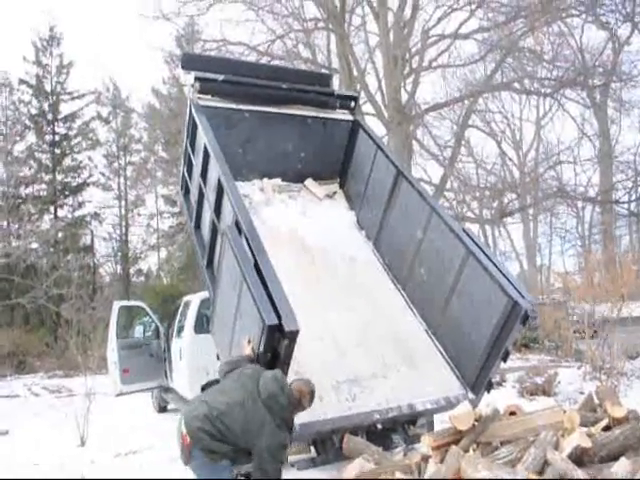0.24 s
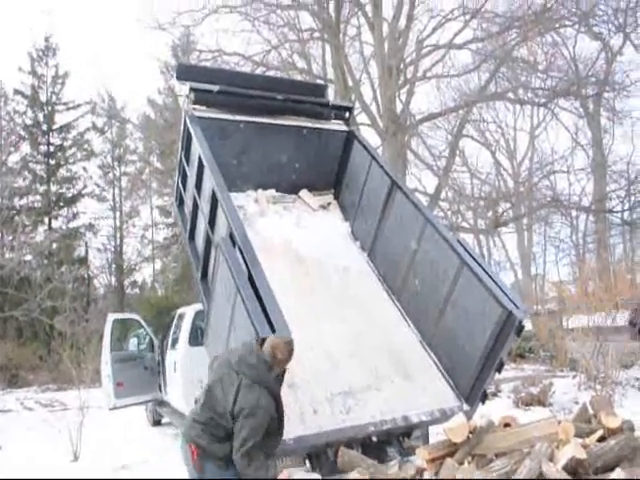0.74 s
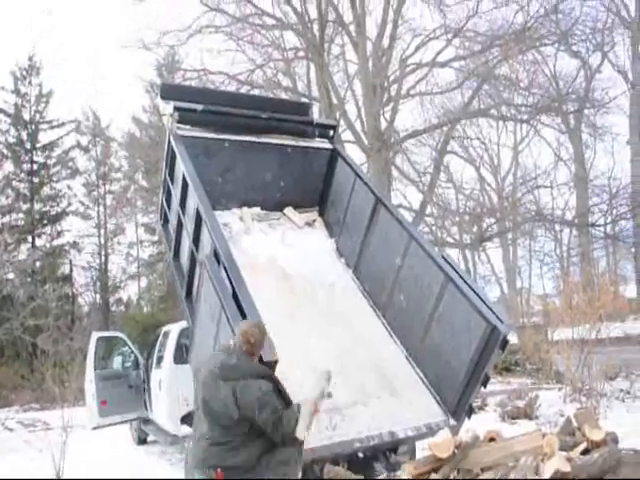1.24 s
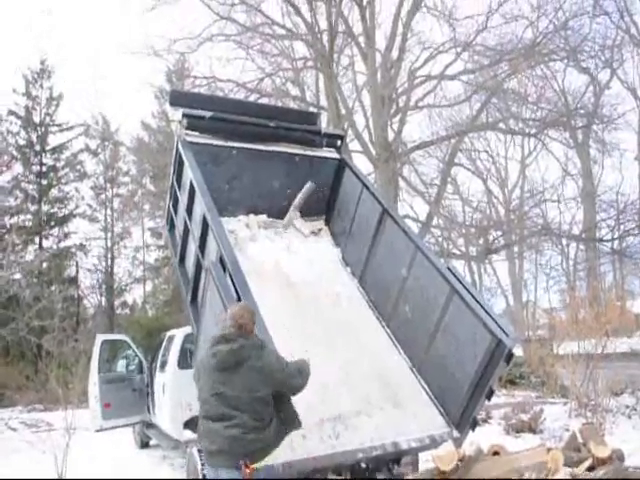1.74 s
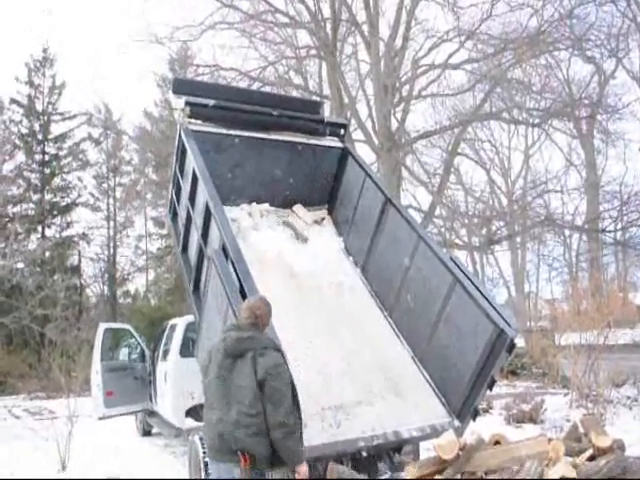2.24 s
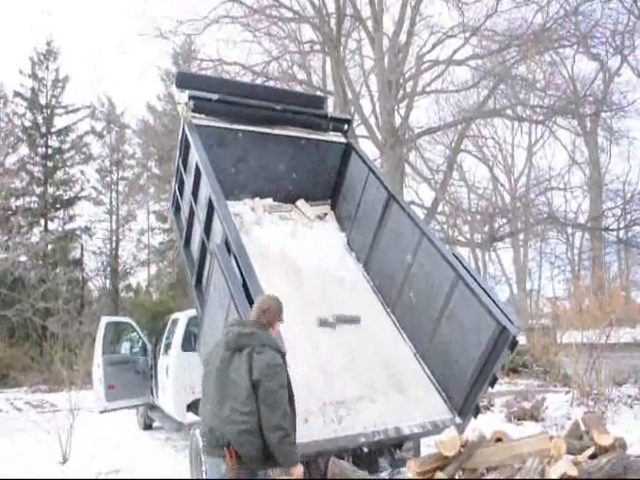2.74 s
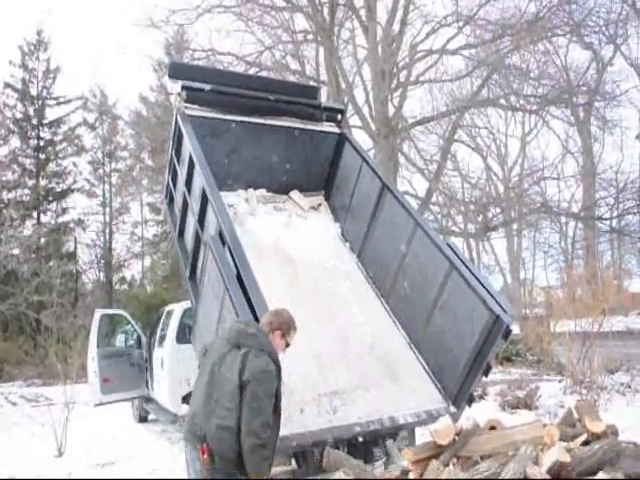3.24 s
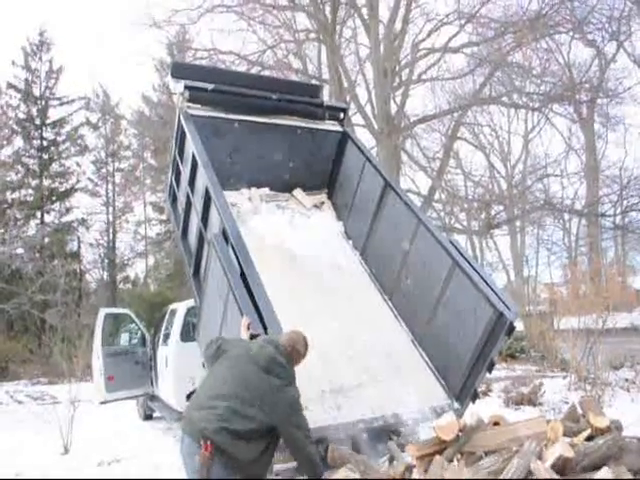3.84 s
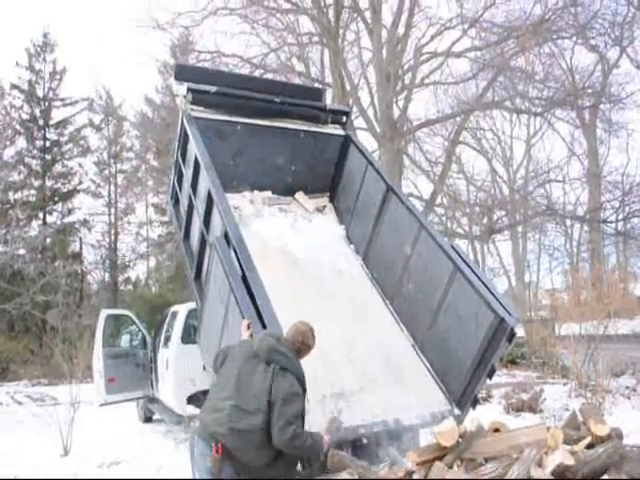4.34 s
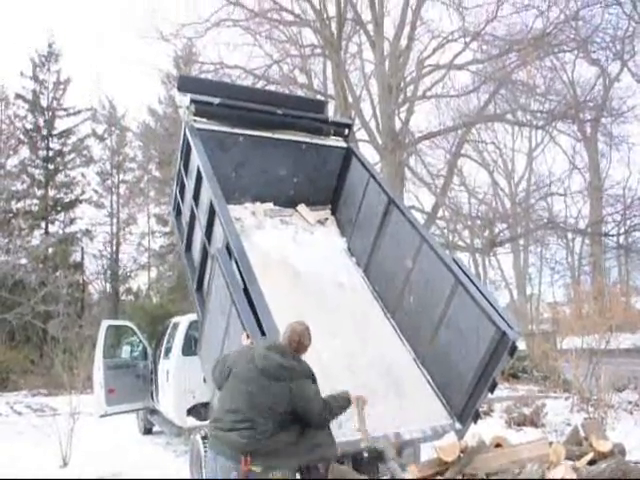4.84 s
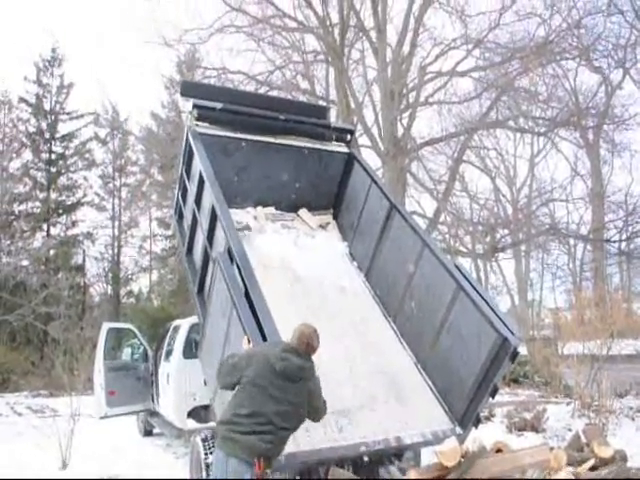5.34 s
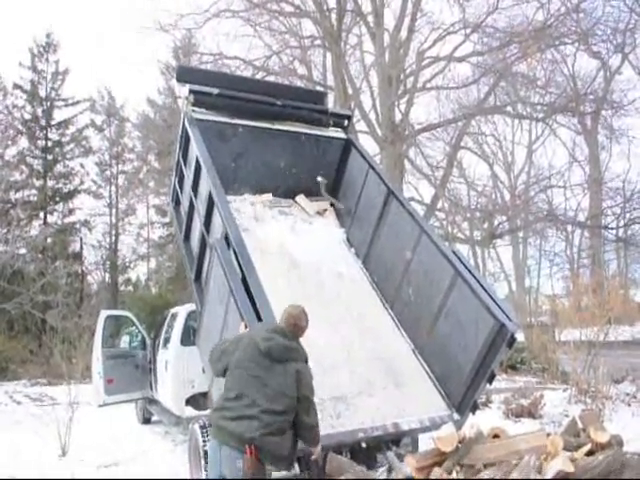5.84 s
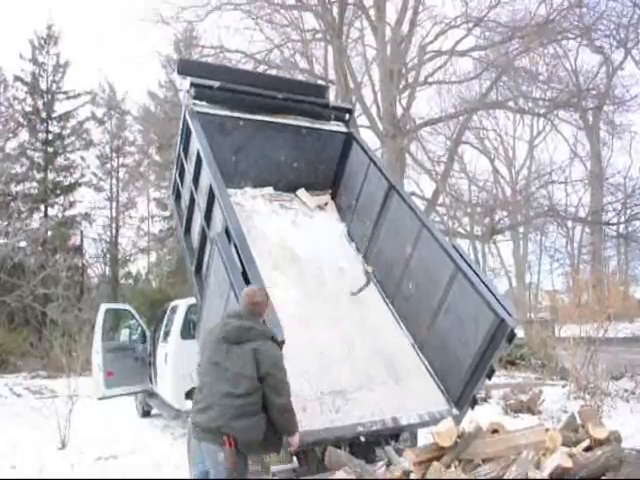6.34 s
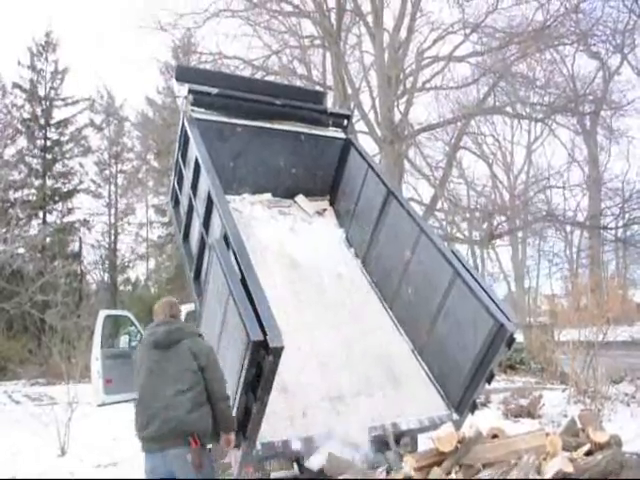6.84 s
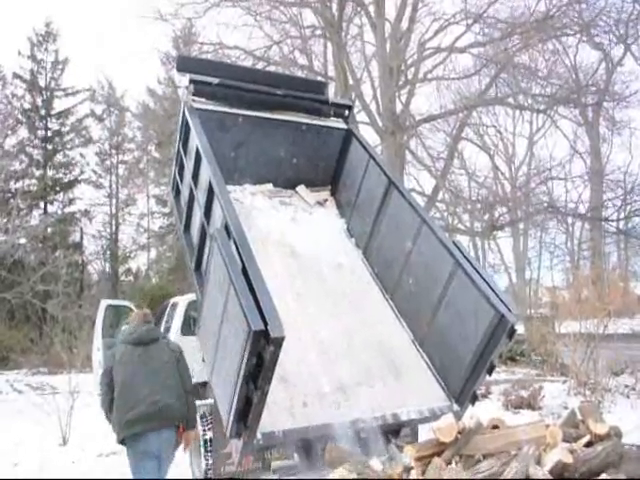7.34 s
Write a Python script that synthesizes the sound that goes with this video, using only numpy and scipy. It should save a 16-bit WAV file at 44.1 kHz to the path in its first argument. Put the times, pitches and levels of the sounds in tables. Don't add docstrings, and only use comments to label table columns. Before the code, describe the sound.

Outdoors near a road, the broad rushing tyre noise of passing cars opens fairly strong and slowly fades, with a faint wavering motor hum far off. A dull tap comes at 0.8 s, with tiny wood knocks up to 1.9 s. At 2.15 s a firewood stick strikes a tilted steel truck bed: a hard hollow boom. From 2.5 to 3.25 s it bounces and slides, a dense run of booms, clanks and wooden knocks. Then only low road noise, with faint taps around 4.5 s. At 5.2 s a second stick lands with a sharp bright crack and clank, with more blows at 5.5 and 5.6 s. From 6.1 to 7.1 s it tumbles down with loose bits, banging, scraping and rattling in irregular clusters, while cars swell around 6.5 s. Road noise remains to the end. The small microphone sounds thin, gritty and clips on hard hits.

```python
import sys
import numpy as np
from scipy import signal
from scipy.io import wavfile
from scipy.ndimage import uniform_filter1d

SR = 44100
rng = np.random.default_rng(int(sys.argv[2]) if len(sys.argv) > 2 else 0)


def file_out(sig):
    cols = np.atleast_2d(sig).T
    lim = np.clip(cols, -1, 1)
    pcm = np.round(lim * 32767).astype(np.int16)
    wavfile.write(sys.argv[1], SR, pcm)


def volts(x):
    e = np.asarray(x, float) / 20
    return 10 ** e


N = 335160

# (time [s], peak [dB], panel pitch [Hz], clank re boom [dB])
FIRST_THUDS = [(2.151, -7, 280, -8), (2.156, -1.5, 272, -9), (2.169, -11, 400, -12), (2.188, -16, 256, -12),
               (2.229, -16.5, 121, -14), (2.289, -20, 365, -7), (2.538, -11, 217, -11.5),
               (2.574, -3, 258, -4), (2.6, -13, 260, -7), (2.655, -24, 194, -19), (2.721, -4.5, 232, -19),
               (2.759, -16, 280, -17), (2.807, -14.5, 291, -16), (2.856, -10.5, 321, -9),
               (2.875, -5, 243, -9.5), (2.894, -5, 300, -28), (2.91, -6, 255, -24), (3.003, -12, 216, -28),
               (3.018, -9.5, 256, -12), (3.054, -11, 340, -9), (3.072, -14, 380, -8),
               (3.098, -4, 371, -5.5), (3.123, -12, 210, -8), (3.184, -20, 333, -2),
               (3.207, -18, 340, -1.5), (3.253, -20, 164, -6)]
# (time [s], peak [dB], panel pitch [Hz], clank re boom [dB])
SECOND_THUDS = [(5.21, -8, 210, -19), (5.243, -11.5, 215, -7), (5.263, -4, 410, 0.5), (5.268, -6, 240, -14),
                (5.284, -13, 223, -14), (5.304, -23, 260, -1), (5.353, -8, 192, -10),
                (5.472, -7, 435, -7.5), (5.499, -16, 404, -8), (5.596, -5.5, 339, -3), (5.62, -24, 300, -3)]
# (time [s], peak [dB], panel pitch [Hz], clank re boom [dB])
FALL_THUDS = [(6.099, -4, 335, 1), (6.124, -15, 258, 1), (6.146, -18, 403, 5), (6.302, -13, 226, -7),
              (6.329, -21, 196, -8), (6.479, -10, 264, -17), (6.5, -16, 283, -6), (6.555, -17, 337, -10),
              (6.644, -7, 280, -7), (6.652, -6, 275, -16), (6.832, -15, 340, -9), (6.869, -11, 316, -8),
              (6.896, -11.5, 360, -4), (6.923, -14, 270, -8), (7.001, -13, 420, -2), (7.014, -17, 400, 4),
              (7.033, -13, 430, 3), (7.042, -23, 520, 10), (7.06, -20.5, 598, 9), (7.071, -23, 590, 7.5)]
# (frequency [Hz], level [dB], t60 [s])
BED_MODES = [(72, -22, .4), (95.3, -24.5, .4), (121.6, -10, 0.99), (149.7, -4.5, 0.38), (178.2, 1.5, 0.29),
             (205, 3.5, 0.32), (230, 4.5, 0.17), (252, 5.5, 0.27), (283, 1, .3), (304.8, -9.5, 0.59),
             (345, 0.5, 0.26), (385, 0.5, 0.27), (428, -7.5, 0.27), (461, 0.5, 0.21), (516, -5, 0.19)]
# (frequency [Hz], level [dB], t60 [s])
CLANK_MODES = [(639, 9, 0.1), (693, 0.5, 0.38), (751, 5.5, 0.13), (853, 6.5, 0.11), (943, 10.5, 0.092),
               (1010, -1, 0.28), (1120, -9, 0.27), (1245, -13, 0.035), (1373, -21, 0.13), (1530, -5, .07),
               (1690, -7, .06)]
# (time [s], level [dB], frequency [Hz], t60 [s])
POPS = [(2.588, -9, 420, .06), (2.597, -12, 1000, .05), (2.606, -11, 400, .05), (3.104, -9, 300, .07),
        (5.206, -16, 420, .05), (5.222, -11, 330, .04), (5.264, -10, 1550, .04), (6.4805, -7, 300, .04),
        (7.036, -12, 1450, .04), (2.158, -13, 600, .06), (2.147, -14, 900, .03), (2.5755, -9, 950, .04),
        (2.713, -18, 850, .04), (2.872, -12, 900, .03), (2.872, -17, 3100, .02), (3.0, -14, 2600, .03),
        (3.2, -20, 760, .12), (5.268, -8, 1100, .04), (5.471, -18, 1500, .02), (6.101, -6, 1000, .04),
        (6.875, -14, 1300, .03), (7.066, -13, 1150, .05), (2.654, -12, 300, .03), (2.8075, -16, 420, .05),
        (3.096, -10, 900, .03), (5.358, -10, 380, .04), (5.47, -6, 520, .05), (5.476, -6, 330, .08),
        (5.487, -10, 430, .04), (5.53, -18, 380, .06), (5.5925, -1.5, 560, .025), (5.602, -13, 400, .06),
        (6.12, -13, 620, .05), (6.139, -10, 700, .05), (6.554, -14, 380, .03), (6.643, -4, 420, .03),
        (6.668, -9, 330, .04), (6.692, -15, 300, .06), (6.836, -15, 400, .03), (6.916, -9, 330, .05),
        (6.996, -13, 800, .03), (7.006, -8, 520, .05), (7.022, -13, 500, .05), (7.0345, -6, 500, .03),
        (7.042, -5, 1250, .03), (7.058, -10, 900, .05)]
# (time [s], peak [dB], ring [Hz], crack above 3 kHz re knock [dB], ring share [dB])
STRAY_KNOCKS = [
    (0.923, -26, 1480, -22, 10),
    (1.5994, -26, 1410, 3.5, -7),
    (1.9174, -27.5, 1670, -19, -8),
    (4.449, -27, 1490, -26, 1),
]
# (time [s], peak [dB], ring [Hz], crack re knock [dB], ring share [dB])
FIRST_KNOCKS = [(2.145, -19, 1580, -18, 13.5), (2.575, -20, 2140, -29, 5), (2.648, -24, 2320, -21, 4),
                (2.7144, -15, 2230, -22, -3), (2.726, -18, 2230, -20, -3), (2.793, -26, 2060, -21, 1),
                (2.8073, -21, 1650, -24, 4), (2.8713, -14, 2250, -23, -7), (2.8844, -24, 1980, -18, 9),
                (2.9724, -22, 1770, -13, -10), (2.9995, -13, 1610, -26, 9), (3.0106, -18, 1600, -23, 5),
                (3.0505, -12, 1530, -22, 1), (3.0627, -13, 1600, -27, 6), (3.078, -22, 1600, -20, 8),
                (3.0949, -21, 1500, -18, 17.5), (3.183, -27, 1470, -23, 12), (3.209, -36, 1430, -18, 0)]
# (time [s], peak [dB], ring [Hz], crack re knock [dB], ring share [dB])
SECOND_KNOCKS = [(5.19, -22, 1400, 3, -4), (5.199, -23, 1400, 4, -4), (5.208, -15, 1410, -27, -6),
                 (5.2584, -19, 1390, 12.5, 9.5), (5.2648, -2.5, 3055, -27, -1), (5.27, -17, 1810, 7, -6),
                 (5.2848, -19, 1810, -10, 0), (5.3037, -25, 1770, -14, 4), (5.3484, -22, 1500, -19.5, -4),
                 (5.471, -25, 2050, -36, 3), (5.5034, -33, 1470, -21, 0), (5.5324, -40, 1570, -17, 0),
                 (5.5944, -7.5, 1600, -13, -12)]
# (time [s], peak [dB], ring [Hz], crack re knock [dB], ring share [dB])
FALL_KNOCKS = [(6.082, -34, 1450, 4, 0), (6.1018, -2.5, 1800, -30, -13), (6.1425, -24, 1490, 2, 0),
               (6.2045, -30, 1490, 4, -7), (6.2344, -35, 1620, -14, -5), (6.301, -16, 2100, -20, -5),
               (6.453, -17, 1390, -20, -5), (6.4775, -13, 1450, -31, -8), (6.5524, -25, 2230, -19, 0),
               (6.6416, -14, 1610, -6, -10), (6.7677, -21, 2040, 7, 10), (6.811, -20, 1590, 1, 1),
               (6.8346, -17, 1400, -23, -1), (6.872, -16, 1460, -24, 0.5), (6.8942, -19, 1700, -9, 0),
               (7.0038, -23.5, 1509, 4, -5), (7.0364, -27, 1370, -22, 17), (7.0644, -32, 1500, -24, 10)]
# (time [s], peak [dB], centre [Hz], length [s])
SNAPS = [(2.535, -34, 2800, .012), (2.655, -24, 2000, .008), (2.709, -22, 2500, .008),
         (2.722, -25, 2600, .01), (2.815, -24, 2500, .012), (2.828, -34, 4500, .006),
         (3.015, -18, 3000, .006), (3.03, -28, 2500, .01), (3.068, -20, 2500, .01),
         (5.2655, -3, 3300, .005), (5.271, -3, 4200, .004), (5.303, -24, 4000, .005),
         (5.349, -26, 2500, .006), (5.499, -32, 3000, .008), (5.542, -32, 4500, .003),
         (5.6014, -15, 4200, .006), (5.61, -24, 4200, .016), (5.64, -31, 4500, .01),
         (5.657, -32, 4500, .004), (6.0825, -17, 4200, .003), (6.094, -27, 3600, .004),
         (6.1052, -10, 4600, .008), (6.116, -18, 3800, .028), (6.165, -29, 4000, .02),
         (6.18, -26, 3000, .006), (6.31, -27, 4000, .008), (6.398, -28, 3500, .005),
         (6.418, -24, 2000, .006), (6.45, -22, 2300, .014), (6.473, -18, 3100, .009),
         (6.575, -28, 3500, .006), (6.62, -24, 2000, .008), (6.642, -18, 3300, .007),
         (6.757, -30, 3300, .005), (6.792, -26, 3500, .006), (6.8126, -20, 4000, .004),
         (6.83, -24, 3500, .006), (6.84, -26, 4000, .006), (6.901, -17, 1700, .004),
         (6.935, -30, 3500, .006), (7.011, -22, 3800, .008), (7.021, -24, 4500, .003),
         (7.032, -22, 4100, .008), (7.062, -31, 3800, .005), (5.28, -16, 3600, .02), (6.78, -27, 3600, .03),
         (6.855, -27, 3300, .03), (6.89, -25, 4200, .012), (6.95, -30, 3300, .03), (7.04, -28, 3500, .03)]
# (start [s], length [s], rumble [dB], scrape re rumble [dB], grit re rumble [dB])
SLIDES = [
    (2.17, .2, -39, -10, -16),
    (2.55, .4, -28, -11, -19),
    (2.95, .4, -29, -11, -21),
    (5.18, .24, -30, -3, -13),
    (5.39, .2, -31, -14, -26),
    (5.58, .22, -31, -7, -13),
    (6.1, .24, -30.5, 1, -7),
    (6.3, .37, -28, -1, -5.5),
    (6.63, .15, -28, -22, -30),
    (6.75, .33, -25.5, 1, -11),
]
# (time [s], level [dB], frequency [Hz], t60 [s])
TAPS = [
    (2.7, -20, 90, .2),
    (6.1, -10, 115, .22),
    (6.47, -20, 100, .2),
    (.839, -15, 385, 0.032),
    (0.84, -15, 210, 0.047),
    (4.446, -25, 332, .05),
    (4.568, -27, 326, 0.032),
]
# (time [s], level [dB], nearness [0-1], tyre horn resonance [Hz])
ROAD = [(0.0, -22, 0.69, 860), (0.49, -24.5, 0.62, 890), (1.2, -25.3, 0.57, 930), (1.5, -25.6, 0.56, 740),
        (1.97, -27, 0.61, 740), (2.82, -32, 0.4, 720), (3.26, -33, 0.42, 700), (3.7, -34, 0.35, 1370),
        (4.27, -35, 0.28, 1400), (5.35, -32.5, 0.45, 1450), (5.84, -31.5, 0.49, 1200),
        (6.1, -28.5, 0.52, 1000), (6.55, -24.5, 0.68, 680), (6.74, -30, 0.6, 700), (6.96, -26.5, 0.6, 980),
        (7.6, -27, 0.61, 980)]
# (frequency [Hz], density [dB per Hz])
FAR_SPECTRUM = [(15, -43), (25, -22), (66, -22), (93, 4.5), (152, -7), (174, -5.5), (286, -12), (320, 1.5),
                (503, -15), (1420, -3), (1860, -10.5), (2860, -11), (3830, -21), (4800, -15), (5500, -28.5),
                (7150, -64), (12100, -120)]
# (frequency [Hz], density [dB per Hz])
NEAR_SPECTRUM = [(15, -54), (25, -33), (65, -29), (86, -13.5), (139, -10.5), (178, -16), (244, 6),
                 (293, -22), (320, -8.5), (630, 1), (864, 1.5), (1490, -6.5), (4010, -32), (4910, -35.5),
                 (5500, -36), (7150, -70), (12100, -120)]
# (start [s], length [s], start pitch [Hz], end pitch [Hz], level [dB])
HUM = [
    (0, 2.6, 350, 325, -39),
    (2.9, .85, 270, 227, -43),
    (4.2, .95, 321, 315, -39),
    (5.5, 2.6, 332, 305, -38),
]


def evened(x):
    return x / np.sqrt(np.mean(x ** 2) + 1e-20)


def peaked(x):
    return x / (abs(x).max() + 1e-20)


def read(points, hz):
    f, value = np.transpose(points)
    return np.interp(np.log(hz + 1), np.log(f + 1), value)


def add(mix, start_s, sound):
    part = mix[round(start_s * SR):][:len(sound)]
    part += sound[:len(part)]


def band(x, lo_hz, hi_hz):
    return signal.sosfilt(signal.butter(2, [lo_hz, hi_hz], "band", fs=SR, output="sos"), x)


def ring(modes, weights, t, stretch=0.87):
    hz, db, t60_s = np.transpose(modes).astype(np.float32)[:, :, None]
    t = t.astype(np.float32)
    decay = np.exp(t * (np.float32(-np.log(1000) / stretch) / t60_s))
    sines = np.sin(np.float32(2 * np.pi) * hz * t)
    return (weights * volts(db[:, 0])).astype(np.float32) @ (decay * sines)


def thud(db, hz, clank_db, chance):
    t = np.arange(SR // 4) / SR
    press_s = .0175 * (280 / hz) ** .3
    clank_hz = np.clip(880 + 45 * clank_db, 680, 1080)
    softness = 1 / (1 + volts(4 * clank_db + 46))
    rise = 1 - np.exp(-(t / (.0008 + .005 * softness)) ** 2)
    press = rise * np.exp(-(t / max(press_s, .004)) ** 3)
    panel = [(hz, 0, .3), (hz * 1.312, -9, .2), (hz * 0.78, -12, .2), (hz * 1.834, -9, .08)]
    boom = peaked(press * ring(panel, np.ones(4), t))
    boom = boom + rise * ring([(104, db - 16, 0.13)], np.ones(1), t)

    near = np.exp(-(np.log(np.transpose(BED_MODES)[0] / hz) / 0.81) ** 2)
    bed = ring(BED_MODES, near * chance[5:5 + len(BED_MODES)], t, .75)
    bed = peaked((1 - np.exp(-t / 0.0049)) * bed)

    near = .5 + np.exp(-(np.log(np.transpose(CLANK_MODES)[0] / clank_hz) / 0.14) ** 2)
    clank = ring(CLANK_MODES, near * np.sign(chance[-len(CLANK_MODES):]), t, 35 * press_s)
    clank = peaked(clank * (1 - np.exp(-t / .0006)))
    shake = chance[32:] * np.exp(-(t[:len(chance) - 32] / (0.83 * press_s)) ** 2)
    add(clank, 0, volts(-1.5) * peaked(band(shake, 410, 1420)))
    return volts(db) * (boom + volts(-8.5) * bed + volts(clank_db - 1.5) * clank)


def pop(db, hz, t60_s):
    t = np.arange(SR // 8) / SR
    panel = ring([(hz, 0, t60_s), (hz * 1.7, -8, t60_s * .6)], np.ones(2), t)
    return volts(db) * peaked(panel * (1 - np.exp(-t / .0003)))


def knock(db, hz, crack_db, ring_db, noise):
    t = np.arange(len(noise)) / SR
    chatter_s = .0056 - .00015 * ring_db
    first = noise * np.exp(-(t / max(1.58 * chatter_s, .001)) ** 2) * (1 - np.exp(-t / 0.00049))
    tail = noise * np.exp(-t / 0.027) * (1 - np.exp(-t / 0.0034))
    stick = ring([(hz, 0, .03), (hz * 1.6, -9, .018), (hz * .65, -8, .02)], np.ones(3), t)
    wood = volts(ring_db) * peaked(signal.fftconvolve(first, stick)[:len(t)])
    contact = first + volts(-5) * tail
    wood = wood + peaked(band(band(contact, 790, 2970), 500, 4800))
    crack = peaked(band(first + volts(-8) * tail, 3200, 5300))
    return volts(db - 2) * (wood + volts(crack_db) * crack)


def snap(db, hz, length_s, noise):
    t = np.arange(len(noise)) / SR
    envelope = (t / length_s) ** .4 * np.exp(-(t / length_s) ** 2)
    burst = noise * abs(noise) ** .4 * envelope
    return volts(db) * peaked(band(band(burst, hz / 1.5, hz * 1.5), hz / 2, hz * 1.4))


def impacts(rate_hz, spread_db, limit):
    strength = volts(spread_db * np.minimum(rng.exponential(1, N), limit))
    return strength * rng.choice([-1, 1], N) * (rng.random(N) < rate_hz / SR)


def slide():
    bumps = impacts(500, 2.2, 4)
    grains = impacts(1500, 3.2, 5)
    t = np.arange(SR // 4) / SR
    bed = ring(BED_MODES, (-1.) ** np.arange(len(BED_MODES)), t, 0.42) * (1 - np.exp(-t / 0.0054))
    rumble = evened(signal.oaconvolve(bumps, bed)[:N])
    panels = ring(CLANK_MODES, np.ones(len(CLANK_MODES)), t, 0.19)
    scrape = evened(signal.oaconvolve(grains, panels)[:N])
    grit = evened(band(band(grains, 1050, 3000), 800, 4200))

    skid_power, out = np.zeros(N), np.zeros(N)
    skid_t60_s, skid_rise_s = .35, .02
    for start_s, db, *_ in FIRST_THUDS + SECOND_THUDS + FALL_THUDS:
        skid = volts(db - 21 - 60 * t / skid_t60_s) * (1 - np.exp(-t / skid_rise_s))
        add(skid_power, start_s, skid ** 2)
    for start_s, length_s, db, scrape_db, grit_db in SLIDES:
        at = np.arange(round(start_s * SR), round((start_s + length_s) * SR))
        gain = np.sqrt(volts(db) ** 2 + skid_power[at]) * signal.windows.tukey(len(at), .25)
        out[at] += gain * (rumble[at] + volts(scrape_db) * scrape[at] + volts(grit_db) * grit[at])
    return out


def tap(db, hz, t60_s):
    t = np.arange(SR // 8) / SR
    return volts(db) * peaked(ring([(hz, 0, t60_s)], np.ones(1), t) * (1 - np.exp(-(t / .003) ** 2)))


def road():
    hop = 256
    frames, hz = N // hop + 5, np.fft.rfftfreq(1024, 1 / SR)[:, None]
    real, imag, patches = rng.standard_normal((frames, 513, 3)).T
    patches = evened(uniform_filter1d(uniform_filter1d(patches, 6, 0), 18, 1))
    time_s, *columns = np.transpose(ROAD)
    db, near, horn_hz = (np.interp(np.arange(frames) * hop / SR, time_s, c) for c in columns)
    horn_db = 4.5 - 5 * np.clip((horn_hz - 1050) / 200, 0, 1)
    colour_db = near * read(NEAR_SPECTRUM, hz) + (1 - near) * read(FAR_SPECTRUM, hz)
    colour = volts(colour_db + horn_db * np.exp(-((hz - horn_hz) / 190) ** 2))
    mid = (hz[:, 0] > 600) & (hz[:, 0] < 1800)
    colour = colour / np.sqrt((colour[mid] ** 2).sum(0))
    z = (real + 1j * imag) * colour * volts(db + 1.2 * patches)
    return volts(2.0) * signal.istft(z, nperseg=1024, noverlap=768)[1][:N]


def hum():
    waver = 1 + 0.025 * evened(uniform_filter1d(rng.standard_normal(N), 2500))
    out = np.zeros(N)
    for start_s, length_s, from_hz, to_hz, db in HUM:
        wobble = waver[round(start_s * SR):][:round(length_s * SR)]
        u = np.arange(len(wobble)) / (length_s * SR)
        pitch_hz = (from_hz + (to_hz - from_hz) * u) * wobble
        tone = np.sin(2 * np.pi * np.cumsum(pitch_hz) / SR)
        add(out, start_s, volts(db) * np.sin(np.pi * u) ** .7 * tone)
    return out


def scene():
    mix = road() + slide() + hum()
    thuds = FIRST_THUDS + SECOND_THUDS + FALL_THUDS
    for (start_s, *blow), chance in zip(thuds, rng.standard_normal((80, 3000))):
        add(mix, start_s, thud(*blow, chance))
    knocks = sorted(STRAY_KNOCKS + FIRST_KNOCKS + SECOND_KNOCKS + FALL_KNOCKS)
    for (start_s, *blow), noise in zip(knocks, rng.standard_normal((80, 4500))):
        add(mix, start_s, knock(*blow, noise))
    for start_s, *bump in TAPS:
        add(mix, start_s, tap(*bump))
    for start_s, *touch in POPS:
        add(mix, start_s, pop(*touch))
    for (start_s, *crack), noise in zip(SNAPS, rng.standard_normal((60, 2500))):
        add(mix, start_s, snap(*crack, noise))
    return mix[None]


def thinned(x):
    hz, _, z = signal.stft(x, SR, nperseg=2048)
    power = abs(z) ** 2
    local = uniform_filter1d(uniform_filter1d(power, size=6, axis=1), size=3, axis=2)
    local_db = 10 * np.log10(local + 1e-20)
    total_db = 10 * np.log10(power.sum(1, keepdims=True) + 1e-20)
    floor_db = np.interp(hz, [0, 9000, 10000, 13500, 14600, 15500], [-140, -140, -71, -72, -64, -66])
    limit_db = .6 * total_db + floor_db[:, None]
    return signal.istft(z * (local_db > limit_db), SR, nperseg=2048)[1][:, :N]


def top_cut(x):
    return signal.sosfilt(signal.butter(12, 15580, fs=SR, output="sos"), x)


def record(dry):
    hold_hz = SR / 4
    mic = signal.sosfilt(signal.butter(2, 48., "high", fs=SR, output="sos"), dry)
    smooth = signal.oaconvolve(mic, signal.firwin(61, 6000., fs=SR)[None], "same")
    lifted = signal.lfilter([1.25, -.25], [1], smooth)
    ticks = (np.arange(N) * hold_hz // SR * SR // hold_hz).astype(int)
    held = np.clip(lifted, -1, 1)[:, ticks]
    edge = signal.firwin(511, 15500, window=("kaiser", 9), fs=SR)[None]
    finished = np.clip(thinned(signal.oaconvolve(held, edge, "same")), -1, 1)
    return top_cut(finished)


dry = scene()
out = record(dry)
file_out(out)
```